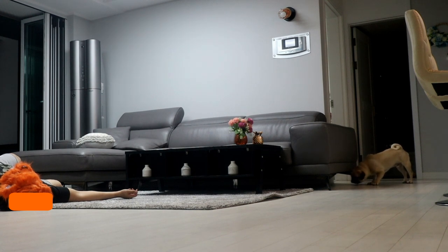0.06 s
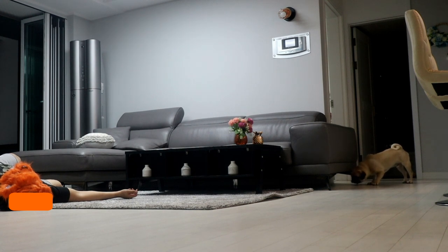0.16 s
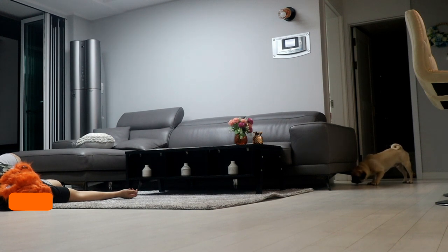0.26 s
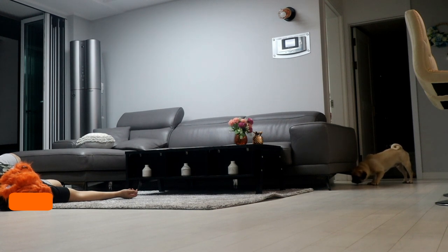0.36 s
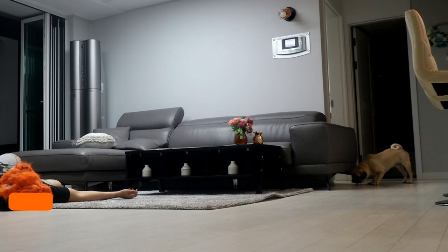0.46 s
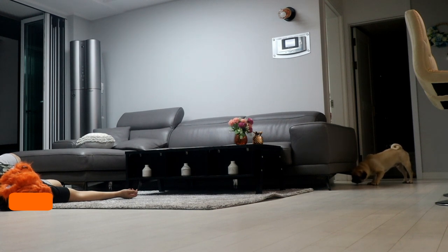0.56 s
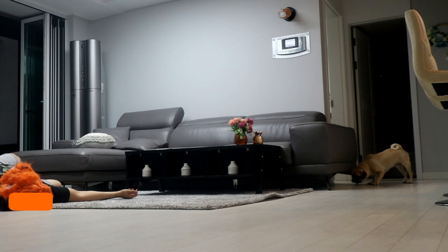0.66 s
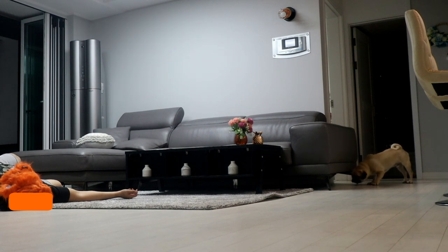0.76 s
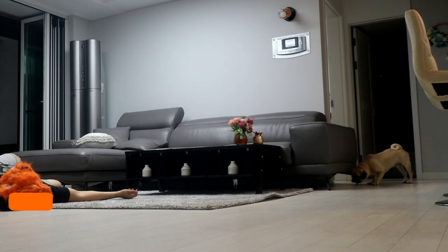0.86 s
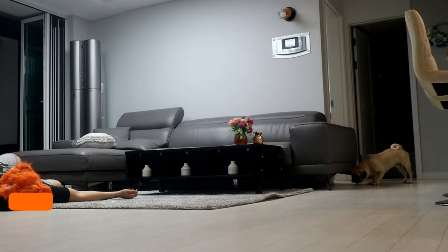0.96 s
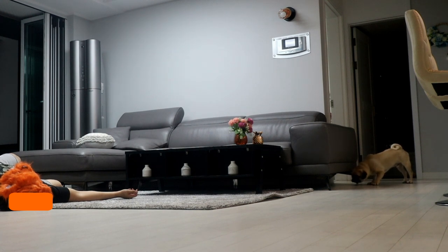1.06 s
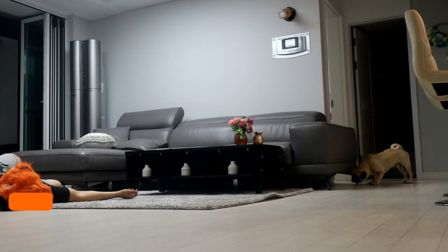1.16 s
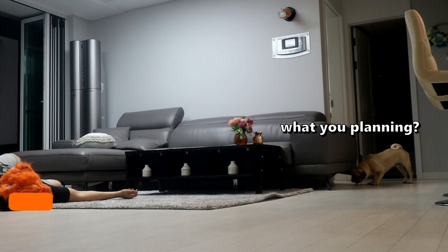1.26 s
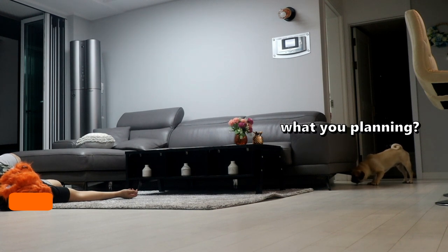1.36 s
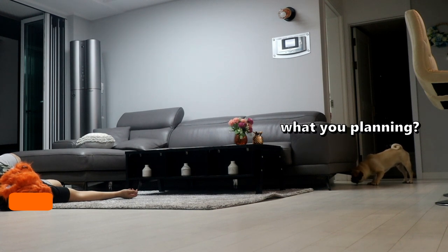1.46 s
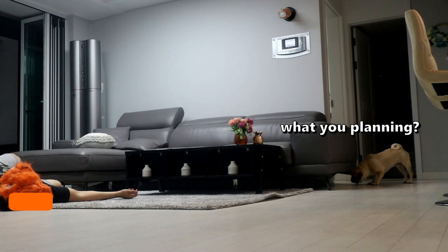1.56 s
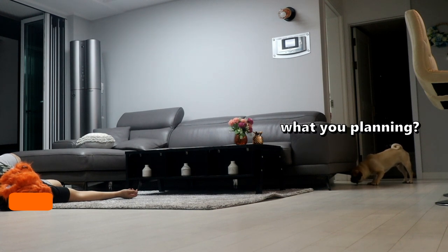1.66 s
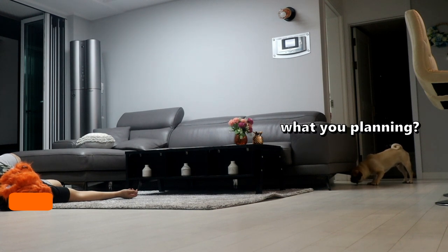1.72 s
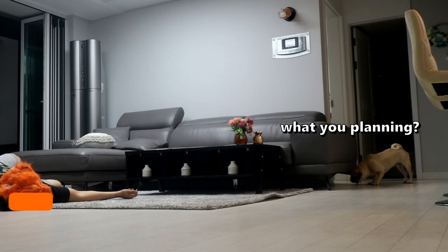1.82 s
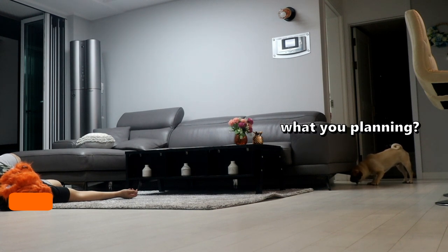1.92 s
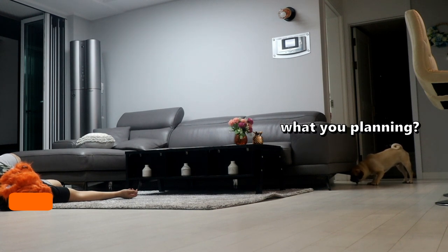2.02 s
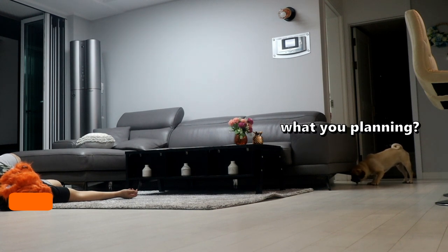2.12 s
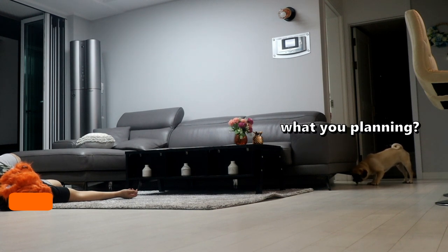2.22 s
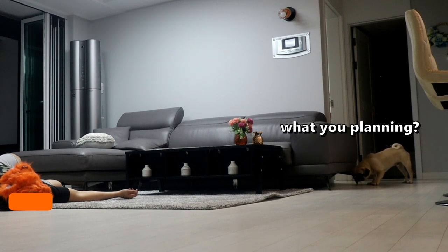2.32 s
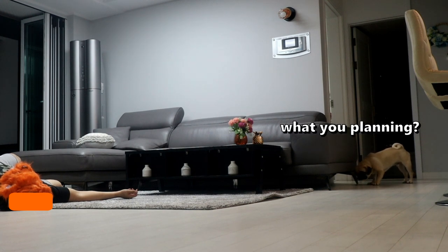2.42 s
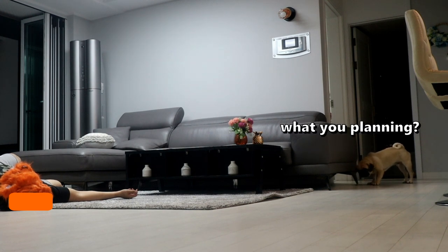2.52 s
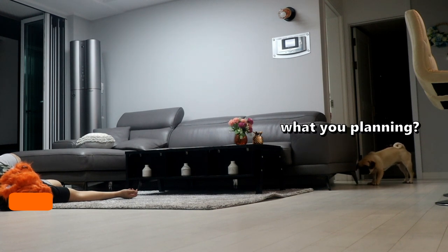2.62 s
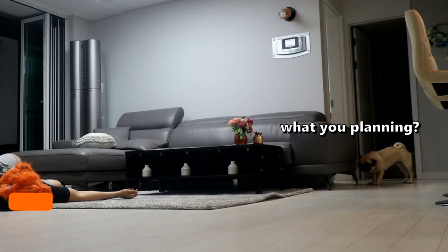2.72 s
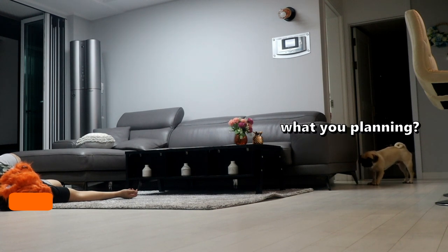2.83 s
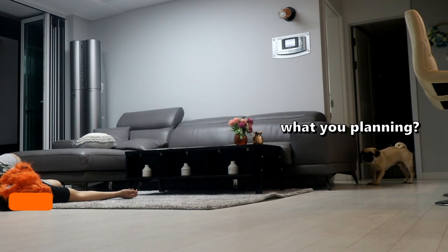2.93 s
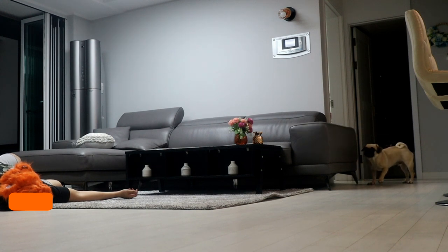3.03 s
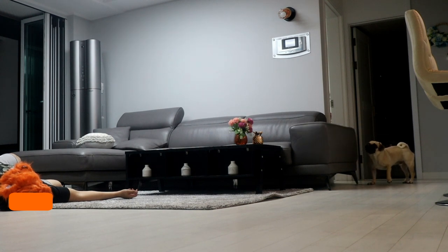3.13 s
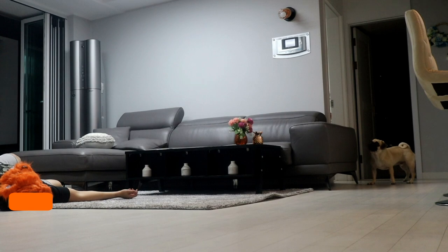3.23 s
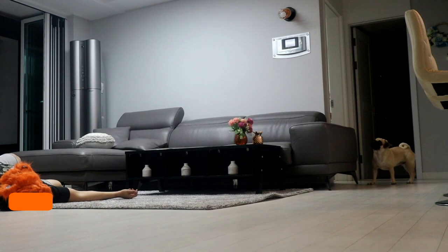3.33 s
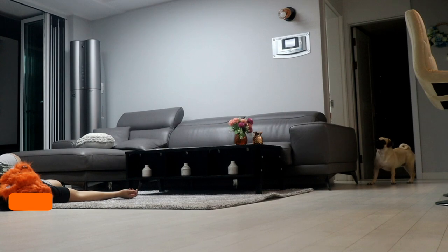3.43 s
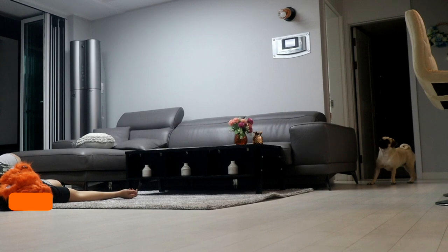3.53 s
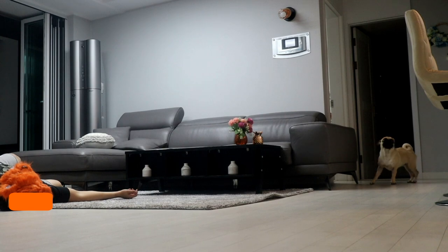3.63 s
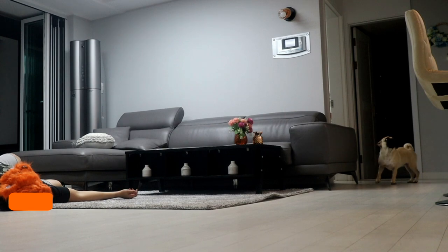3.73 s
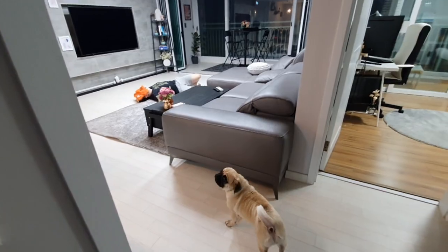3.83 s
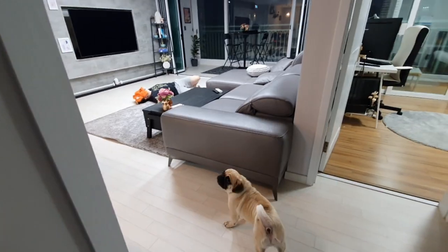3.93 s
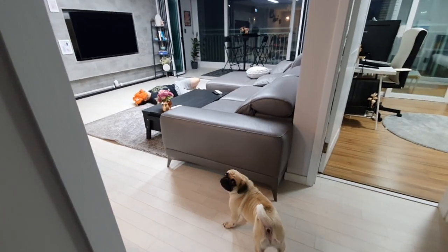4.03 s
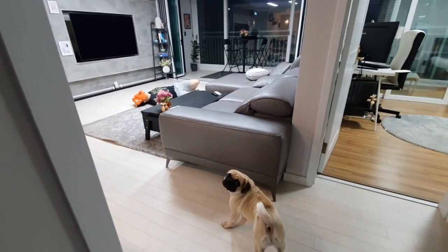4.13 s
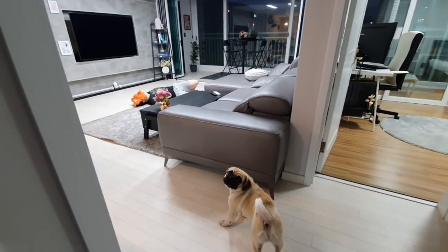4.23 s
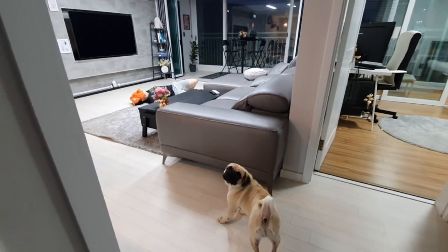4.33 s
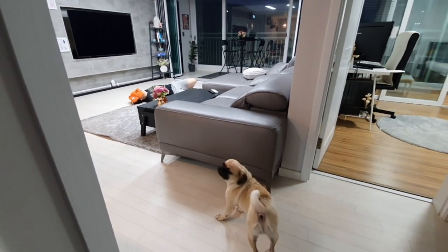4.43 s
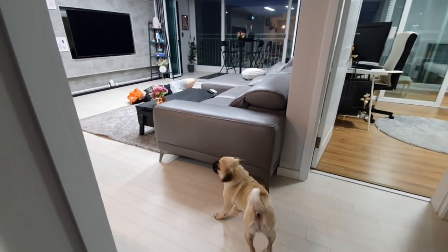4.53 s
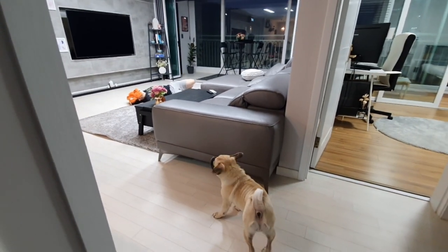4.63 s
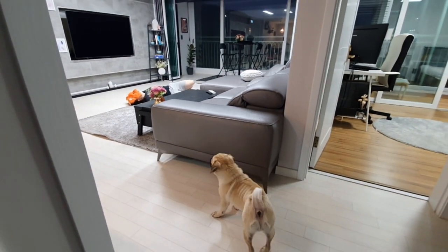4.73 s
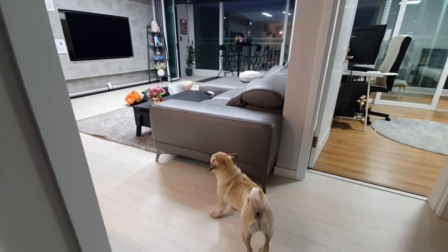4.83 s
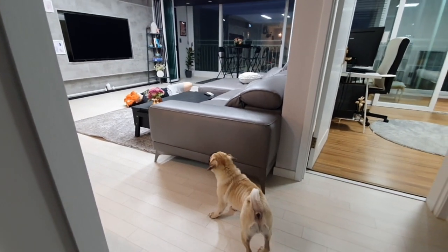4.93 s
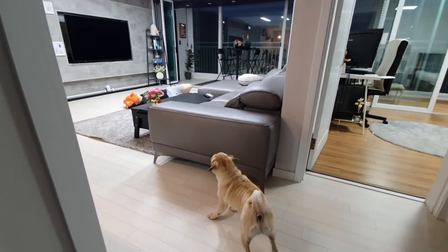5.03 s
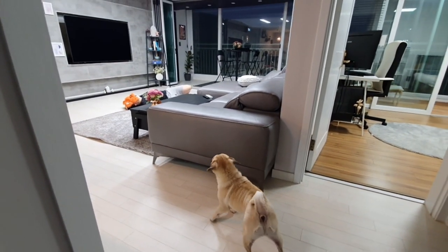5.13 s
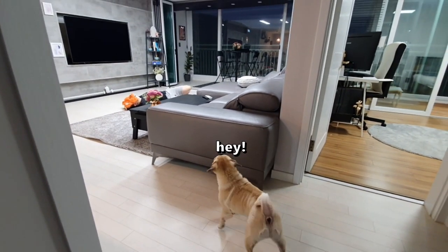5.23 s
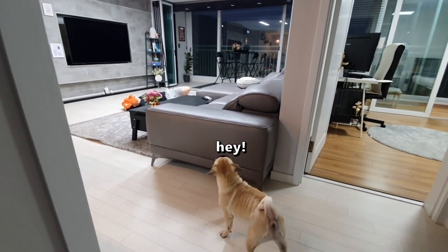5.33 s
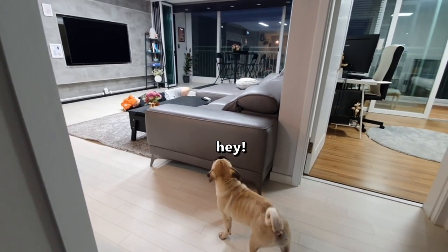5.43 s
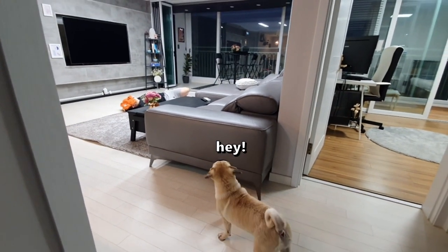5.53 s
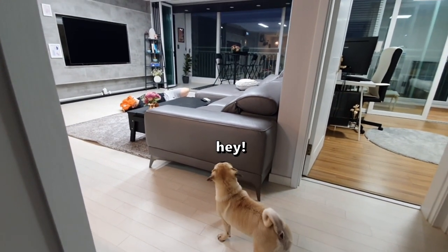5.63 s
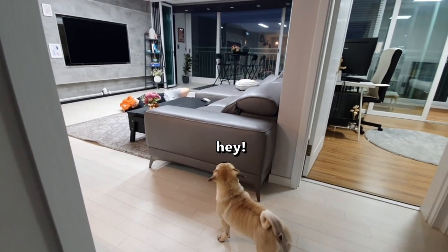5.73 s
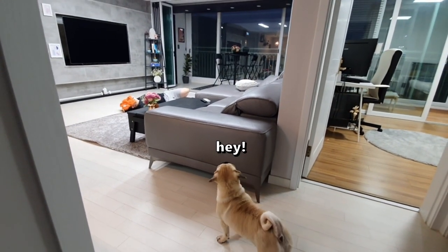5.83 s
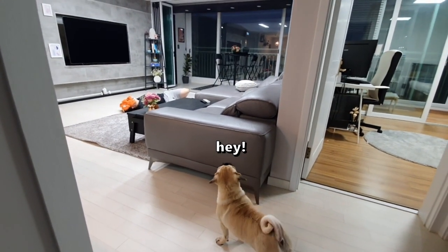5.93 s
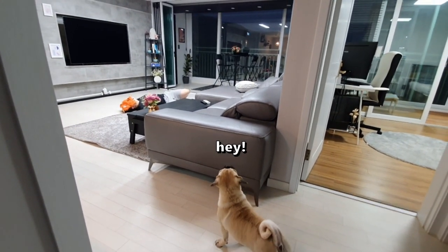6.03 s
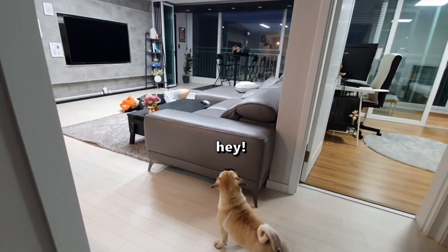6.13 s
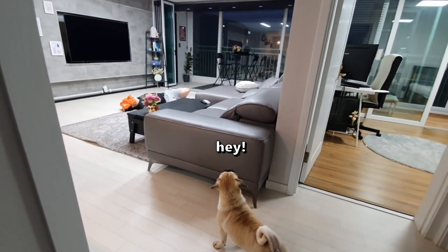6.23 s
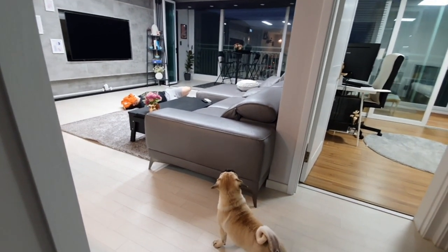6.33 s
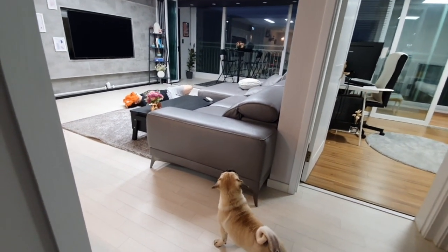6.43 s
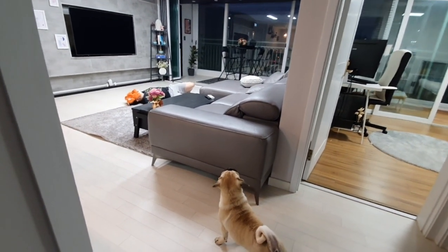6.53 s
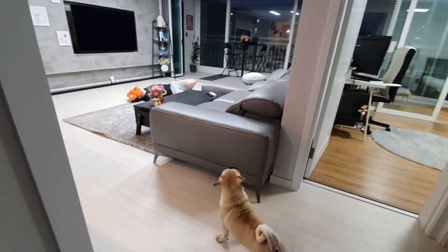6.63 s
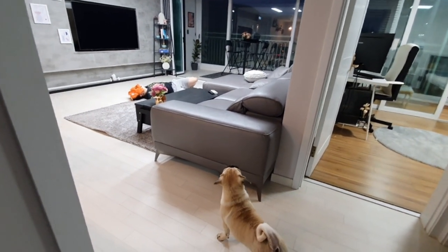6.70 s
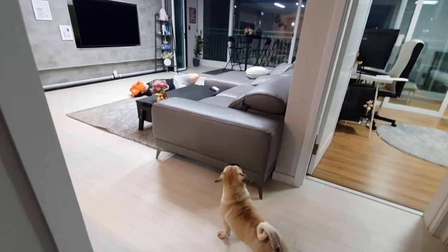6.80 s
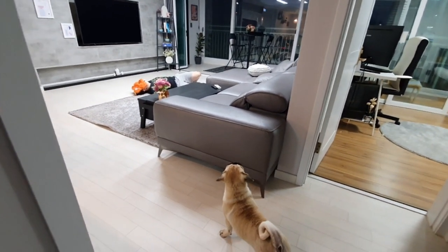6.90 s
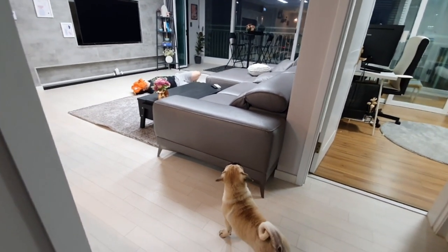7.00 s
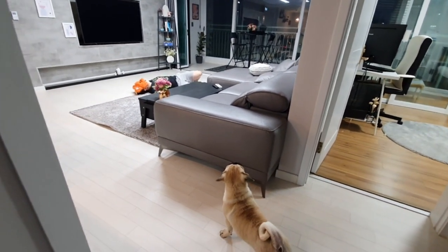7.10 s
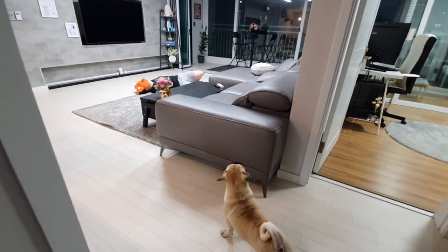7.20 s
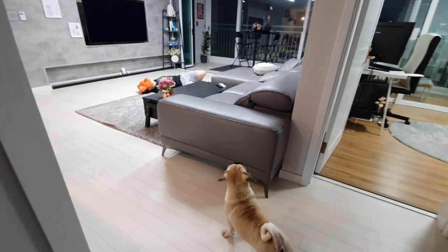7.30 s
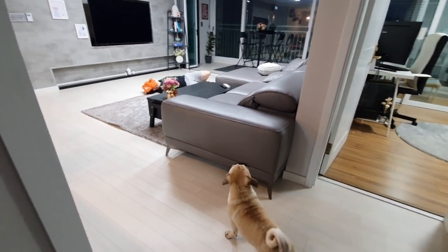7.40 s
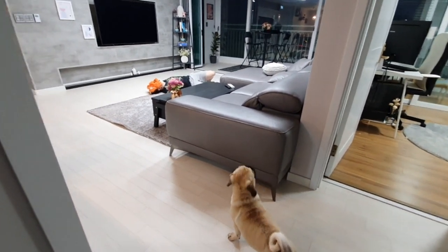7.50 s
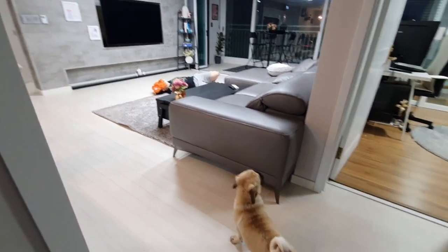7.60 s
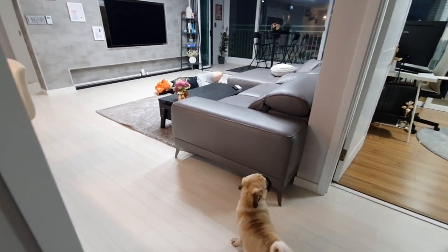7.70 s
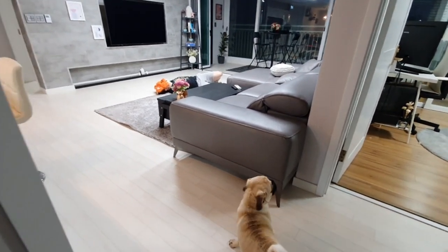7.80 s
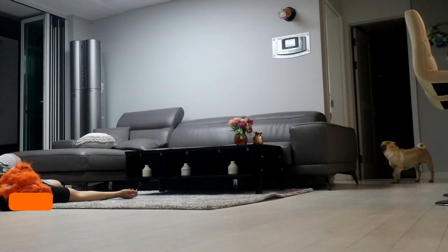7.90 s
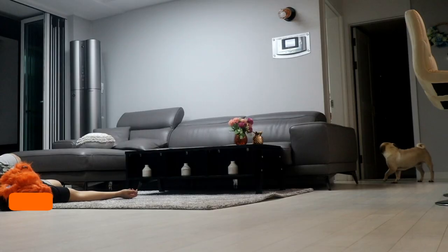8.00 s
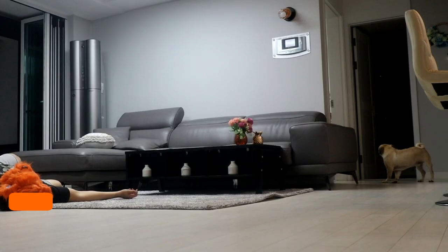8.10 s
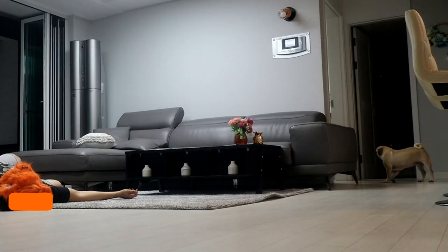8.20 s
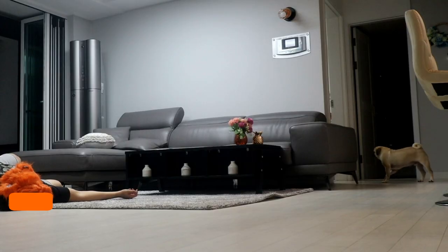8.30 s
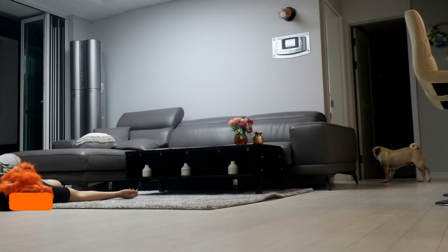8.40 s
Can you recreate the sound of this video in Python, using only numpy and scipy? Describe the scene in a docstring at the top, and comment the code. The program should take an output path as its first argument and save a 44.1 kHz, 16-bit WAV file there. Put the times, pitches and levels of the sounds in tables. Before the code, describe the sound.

In a reverberant living room with hard flooring, a small flat-faced dog holds a faint gravelly growl that pulses with palate flaps and breaks into one breathy woof, heard from across the room over hiss. After light claw scuffs, a closer, quieter perspective brings a bright loud bark, faint ticking paws, then a shorter, slightly lower bark with a ringing tail. Claws click, and the distant hissy perspective returns briefly.

```python
"""Pug growl, woof and two barks

A pug growls low across a hard-floored living room, slack folds and flapping palate, and ends in a gruff woof.
From close behind it barks twice, clear tone in rasp, with claw ticks and scuffs on the boards.
The background hisses at the far microphone, is quiet at the near one, and is far again for the last half second.
Noise-built reflections surround the dog; decaying room modes ring after each bark."""
import sys
import numpy as np
from scipy import signal
from scipy.fft import rfft, irfft, next_fast_len
from scipy.io import wavfile
from scipy.ndimage import uniform_filter1d, minimum_filter1d, map_coordinates

SR = 44100
rng = np.random.default_rng(int(sys.argv[2]) if len(sys.argv) > 2 else 0)


def to_wav(s):
    """Save 16-bit WAV."""
    ch = np.atleast_2d(s).T  # columns
    pcm = np.round(np.clip(ch, -1, 1) * 32767)  # PCM
    wavfile.write(sys.argv[1], SR, pcm.astype(np.int16))


N = 372729
TIME = np.arange(N) / SR

# left-right likeness of room sound, far and near: freq_hz, correlation
FAR_ALIKE = [(50, 0.88), (130, 1), (330, 0.78), (700, 0.15), (1300, -0.19), (3000, -0.031), (10000, -0.53)]
NEAR_ALIKE = [(60, 0.52), (300, 1), (700, 0.72), (1400, -0.56), (3000, -0.032), (10000, -0.25)]


def amp(db):
    """Decibels to gain."""
    return 10 ** (np.asarray(db) / 20)


def unit(x):
    """Scale to rms 1."""
    return x / np.sqrt(np.mean(x ** 2) + 1e-20)


def along(points, hz):
    """Interpolate (Hz, value) points on a log-frequency axis."""
    f, v = np.transpose(points)
    return np.interp(np.log(hz + 1), np.log(f + 1), v)


def curves(rows):
    """One value per sample for each column after the time."""
    s, *cols = np.transpose(rows)
    return [np.interp(TIME, s, c) for c in cols]


def wobble(rate_hz):
    """Smooth random curve with rate_hz knots a second."""
    knots = rng.standard_normal(int(N * rate_hz / SR) + 4)
    return map_coordinates(knots, [TIME * rate_hz])


def filtered(x, response):
    """Multiply the spectrum of x by a response of frequency."""
    size = next_fast_len(x.shape[-1] + 8192)
    spectrum = rfft(x, size) * response(np.fft.rfftfreq(size, 1 / SR))
    return irfft(spectrum, size)[..., :x.shape[-1]]


def coloured(x, spectrum, size=4096):
    """Minimum-phase filter with the given (Hz, dB) shape, by folding the cepstrum."""
    cepstrum = irfft(np.log(amp(along(spectrum, np.fft.rfftfreq(size, 1 / SR)))))
    cepstrum[1:size // 2] *= 2
    cepstrum[size // 2 + 1:] = 0
    impulse = irfft(np.exp(rfft(cepstrum)))
    return signal.oaconvolve(x, impulse)[:N]


def levelled(x, seconds):
    """Hold the running rms at 1, so that effort alone sets the loudness."""
    power = np.abs(uniform_filter1d(x * x, int(seconds * SR)))
    return x / np.sqrt(power + 1e-9)


def paired(noises, alike):
    """Turn two unrelated noises into left and right of the given likeness."""
    turn = lambda hz: np.arccos(np.clip(along(alike, hz), -1, 1)) / 2
    mid, side = filtered(noises, lambda hz: np.array([np.cos(turn(hz)), np.sin(turn(hz))]))
    return np.array([mid + side, mid - side])


def in_room(x, alike, direct_db, early_db, tail_db, early_t60=0.034, lag_ms=0.097):
    """Direct sound, right side first by lag_ms; a flurry from floor and furniture; a long tail."""
    # reverberation: freq_hz, t60_s
    room_t60 = [(100, 0.83), (300, 0.56), (700, 0.64), (1500, 0.63), (3000, 0.5), (6000, 0.64),
                (12000, 0.68)]
    age = TIME[:SR]
    hz, t, z = signal.stft(rng.standard_normal((2, SR)), SR, nperseg=256)
    decay = amp(-60 * t / along(room_t60, hz)[:, None])
    tail = signal.istft(z * decay, SR, nperseg=256)[1][:, :SR]
    tail = tail * (1 - np.exp(-age / 0.014))
    early = rng.standard_normal((2, SR)) * amp(-60 * age / early_t60)
    reflections = amp(early_db) * unit(early) + amp(tail_db) * unit(tail)
    walls = paired(reflections, alike) / np.sqrt(SR)
    delay = np.array([[-1j], [1j]]) * lag_ms / 1000  # half the lag on each side
    direct = filtered(x, lambda hz: np.exp(np.pi * hz * delay))
    return amp(direct_db) * direct + signal.fftconvolve(x[None], walls, axes=1)[:, :N]


def folds(pitch_hz, rough, jitter, shimmer_db):
    """Vocal fold pulses, jittered in time and size, mixed with air that escapes once a cycle."""
    cycles = np.cumsum(pitch_hz * np.exp(jitter * wobble(260))) / SR
    at = np.interp(np.arange(1, int(cycles[-1])), cycles, np.arange(N))
    # windowed sinc places each pulse between samples
    taps = at.astype(int)[:, None] + np.arange(-7, 9)
    offset = taps - at[:, None]
    shape = np.sinc(offset) * np.cos(np.pi * offset / 16) ** 2
    sizes = amp(shimmer_db * rng.standard_normal((len(at), 1)))
    pulses = np.bincount(np.clip(taps, 0, N).ravel(), (sizes * shape).ravel(), N + 1)[:N]
    pulses = pulses / np.sqrt(pitch_hz)
    air = rng.standard_normal(N) * (1 + np.cos(2 * np.pi * cycles)) ** 2
    rough = np.clip(rough, 0, 1)
    return np.sqrt(1 - rough) * unit(pulses - pulses.mean()) + np.sqrt(rough) * unit(air)


def push(s, attack_s, length_s, release_db_per_s):
    """Gain of one push of air: it rises, holds until its length is over, and dies away."""
    age = TIME - s
    release = amp(-release_db_per_s * np.maximum(age - length_s, 0))
    return np.clip(age / attack_s, 0, 1) * release


def flutter():
    """Palate flaps: each opens quickly and closes slowly, uneven in timing and size."""
    # soft palate: time_s, rate_flaps_per_s
    flap_rates = [(1.52, 23.6), (1.6, 24.8), (1.9, 24.4), (2.05, 21.5), (2.3, 18.8)]
    from_s, to_s = .03, 2.6
    flap_s, scatter_db = 0.0094, 2.2  # a flap peaks at half flap_s
    stray_cycles = .08
    rate, = curves(flap_rates)
    started = TIME > from_s
    turns = started * np.abs(np.cumsum(rate * started) / SR + stray_cycles * wobble(15))
    u = turns % 1 / rate / flap_s
    sizes = amp(scatter_db * rng.standard_normal(int(turns.max()) + 1))
    return sizes[turns.astype(int)] * 2 * u * np.exp(1 - 2 * u) * (TIME < to_s)


def shifting(x, spectrum, factor, share):
    """Resonances crossfade to ones scaled by factor as share goes from 0 to 1."""
    moved = [(hz * factor, db) for hz, db in spectrum]
    return coloured(x * (1 - share), spectrum) + coloured(x * share, moved)


def growl():
    """Slack folds beat unevenly near 100 Hz; palate flaps swell the voice and gate a nasal whistle."""
    # effort and mouth opening: time_s, effort_db, open_band_db
    pushes = [(0, -38.5, -1.5), (.2, -43, -3), (.5, -40, -2), (.77, -41, -5.5), (.86, -47, -3),
              (1.05, -41, -3), (1.39, -41.5, -1), (1.58, -45, -6.5), (1.87, -41.5, -14.5),
              (2.3, -39.5, -1.5), (2.48, -41, 0.5), (2.82, -46, -9)]
    # voice colours: freq_hz, level_db
    closed_mouth = [(45, -19), (75, 0.5), (102, 1), (140, 0.5), (190, 0.5), (260, -4), (330, -1),
                    (420, -2.5), (530, 2.5), (640, -3.5), (720, -8), (830, -9.5), (1150, -37), (1750, -28),
                    (2400, -36.5), (5000, -47.5)]
    open_mouth = [(500, -45), (780, -4), (1020, 13.5), (1200, -35), (1450, -39), (1750, -27), (2200, -25),
                  (3000, -16), (3400, -5.5), (3900, -24.5), (6000, -55.5)]
    nose = [(1200, -41), (1750, 0), (2300, -24), (3100, -28), (3400, 1), (3900, -17.5), (6400, -24),
            (7100, -7), (7800, -31), (8700, -2.5), (9500, -1.5), (10500, -2), (11400, -30), (15000, -60)]
    shut_mouth_db, ajar_mouth_db, shut_lowers = -11.5, -4.5, 0.94  # resonance factor when shut
    lips_s, lips_width_s, lips_raise = 2.46, 0.098, 1.182  # resonance factor, lips drawn back
    whistle_top_db, whistle_follows = -48.5, 0.22  # at peak effort; dB per dB of effort

    level_db, mouth_db = curves(pushes)
    shut = np.interp(mouth_db, [shut_mouth_db, ajar_mouth_db], [1, 0])
    lips = np.exp(-((TIME - lips_s) / lips_width_s) ** 2)
    flaps = flutter()
    throb = np.sqrt(flaps)
    source = folds(np.full(N, 102.), rough=.3, jitter=.19, shimmer_db=3.0)
    low_voice = shifting(source * (1 + .5 * throb), closed_mouth, shut_lowers, shut)
    upper_voice = shifting(source * (1 + 1.3 * throb), open_mouth, lips_raise, lips)
    voice = amp(level_db + 2.0) * levelled(low_voice, 0.039)
    voice += amp(level_db + mouth_db - 9.0) * levelled(upper_voice, 0.06)
    voice *= np.interp(TIME, [2.76, 2.84], [1, 0])

    whistle_db = whistle_top_db + whistle_follows * (level_db - level_db.max())
    nasal = coloured(folds(np.full(N, 170.), rough=0.56, jitter=0.14, shimmer_db=-1), nose)
    whistle = flaps * amp(whistle_db) * levelled(nasal, .03)
    return (in_room(voice, FAR_ALIKE, direct_db=-2.5, early_db=-3, tail_db=-2.5, early_t60=0.098)
            + in_room(whistle, FAR_ALIKE, direct_db=-13.0, early_db=-1.5, tail_db=-4,
                      early_t60=0.017, lag_ms=0.13))


def background():
    """Rumble and hiss from shaped noise: strong at the far microphone, faint and left at the near one."""
    # floor colours: freq_hz, level_db
    far_floor = [(15, -41), (30, -10), (55, -1.5), (110, -9.5), (190, -7.5), (400, -11.5), (900, -13.5),
                 (1500, -19), (2700, -22), (6000, -30), (11000, -36), (12500, -44.5), (15500, -69.5)]
    near_floor = [(15, -41.5), (25, -17), (64, -1.5), (144, -20.5), (178, -15), (297, -18.5), (433, -22),
                  (598, -25.5), (871, -23), (1900, -37.5), (3440, -44.5), (9810, -61.5), (15500, -52)]
    # far microphone: time_s, share_0_1
    far_share = [(0, 1), (3.772, 1), (3.78, 0), (7.918, 0), (7.928, 1), (8.46, 1)]
    # floor likeness: freq_hz, correlation
    far_likeness = [(50, 0.94), (130, 0.6), (330, 0.1), (700, -0.16), (3000, -0.6), (10000, -0.52)]
    near_likeness = [(60, -0.033), (300, 0.078), (1200, -0.63), (8000, -0.41)]

    def hush(colour, alike):
        """Stereo noise of rms 1 with the given colour and likeness."""
        noise = paired(rng.standard_normal((2, N)), alike)
        return unit(filtered(noise, lambda hz: amp(along(colour, hz))))

    share, = curves(far_share)
    far = hush(far_floor, far_likeness) * amp([[-46], [-47.5]])
    near = hush(near_floor, near_likeness) * amp([[-52], [-58]])
    return share * far + (1 - share) * near * amp(1.4 * wobble(3.7))


def swell(s, length_s):
    """Rise to 1 at half length_s after s, then a slower fall."""
    u = np.clip((TIME - s) / length_s, 0, 20)
    return 2 * u * np.exp(1 - 2 * u)


def touch(s, db, length_s, response):
    """Short grainy rub: a swell of noise in the band that response lets through."""
    span = SR // 2
    start = min(round(s * SR), N - 1)
    grain = np.zeros(N + span)
    grain[start:][:span] = unit(filtered(rng.standard_normal(span), response))
    return amp(db) * swell(s, length_s) * grain[:N]


def paws():
    """Claws scuff as wideband noise; pads thud as noise through a damped resonance."""
    # scuffs on the boards: start_s, level_db, length_s, upper_edge_hz, strokes
    scuff_rows = [(2.615, -50.5, 0.023, 13000, 3), (3.345, -50.5, 0.023, 13200, 1),
                  (3.434, -51.5, 0.024, 12900, 3), (3.473, -42, .018, 8300, 1),
                  (3.841, -57.5, 0.028, 6100, 1), (4.83, -59.5, 0.039, 5500, 1),
                  (5.225, -63, 0.045, 5500, 1), (5.994, -68, 0.039, 2160, 1),
                  (6.751, -63.5, 0.011, 5060, 1), (6.965, -58.5, 0.021, 7000, 1),
                  (8.192, -52.5, 0.033, 13100, 1), (8.314, -42.5, 0.026, 13800, 1)]
    # scuff colour: freq_hz, level_db
    scuff_colour = [(300, 0.5), (1200, -3.5), (2700, -2.5), (4500, -7), (7000, -3.5), (10800, -1.5),
                    (12500, -5.5), (15500, -26)]
    # soft footfalls: start_s, level_db, length_s, pitch_hz
    step_rows = [(2.803, -37, 0.03, 61.5), (3.874, -46.5, 0.026, 520), (3.882, -48, .052, 78),
                 (4.797, -54.5, 0.045, 560), (4.807, -51, 0.068, 76), (5.279, -46.5, .025, 65.7),
                 (6.0, -50.5, .05, 75.6), (7.961, -47, 0.11, 138)]
    stroke_gap_s = .044

    scuffs = np.zeros(N)
    for s, db, length_s, edge_hz, strokes in scuff_rows:
        band = lambda hz: amp(along(scuff_colour, hz)) / (1 + (hz / edge_hz) ** 6)
        for k in range(round(strokes)):
            scuffs += touch(s + k * stroke_gap_s, db, length_s, band)
    steps = np.zeros(N)
    for s, db, length_s, pitch_hz in step_rows:
        thud = lambda hz: (hz * pitch_hz / (pitch_hz ** 2 - hz ** 2 + 1j * hz * pitch_hz)) ** 2
        steps += touch(s, db, length_s, thud)
    grainy = scuffs * amp(4.2 * wobble(400))
    return (in_room(grainy, FAR_ALIKE, direct_db=-8, early_db=-1.5, tail_db=-2)
            + in_room(steps, FAR_ALIKE, direct_db=-4.5, early_db=-5.0, tail_db=-3.5))


def call(row, throat, jitter, shimmer_db, steady_air_db):
    """One push of voice through the throat, with some air that streams out unchopped."""
    s, attack_s, hold_s, release_db_per_s, level_db, top_hz, rough = row
    top_s, sag_per_s = 2.7, 2.8  # log pitch per s, away from top_s for 0.2 s, then steady
    pitch_hz = top_hz * np.exp(-sag_per_s * np.minimum(np.abs(TIME - top_s), .2))
    source = folds(pitch_hz, rough, jitter, shimmer_db) + amp(steady_air_db) * rng.standard_normal(N)
    voice = levelled(coloured(source, throat), 0.015)
    return push(s, attack_s, attack_s + hold_s, release_db_per_s) * amp(level_db) * voice


def woof():
    """Three overlapping pushes: the chest swells, the mouth bursts open, the voice ends in a rasp."""
    # chest, mouth, rasp: start_s, attack_s, hold_s, release_db_per_s, level_db, pitch_at_2.7_s_hz, rough_0_1
    calls = [(2.863, 0.028, 0.081, 237, -29, 115, 0.82), (2.909, 0.0072, 0.043, 139, -26, 190.8, 0.8),
             (2.965, .045, .006, 184, -39, 179.3, 0.8)]
    # colours: freq_hz, level_db
    chest_colour = [(50, -28), (100, 0), (190, 0.5), (270, -3.5), (380, 4.5), (600, -4), (830, -9),
                    (1200, -32), (2500, -26.5), (5000, -41), (11000, -33), (14000, -73)]
    mouth_colour = [(120, -7.5), (200, 5), (400, -10), (650, 0), (900, 2.5), (1150, -4.5), (1400, -9.5),
                    (1800, -18), (2700, -18), (3300, -21), (4000, -23), (4700, -39), (6200, -21),
                    (8000, -26), (10600, -18.5), (12500, -40), (15500, -65.5)]
    rasp_colour = [(1500, -29), (2200, -5.5), (2650, 7.5), (3200, -2), (3600, -13), (4500, -18),
                   (12000, -58)]
    chest = call(calls[0], chest_colour, jitter=.14, shimmer_db=6, steady_air_db=-15)
    mouth = call(calls[1], mouth_colour, jitter=.2, shimmer_db=11, steady_air_db=-1.5)
    rasp = call(calls[2], rasp_colour, jitter=.1, shimmer_db=-1, steady_air_db=-10)
    return in_room(chest + mouth + rasp, FAR_ALIKE, direct_db=-2.5, early_db=1.0, tail_db=-3.5)


def patter(count):
    """Faint ticks spread loosely over each run as the dog shifts its weight: (s, dB, Hz) rows."""
    # tick runs: start_s, length_s, level_db
    runs = [(6.018, .075, -50.5), (6.239, 0.13, -54), (6.648, .17, -51)]
    pitch_hz, scatter_db = 1290, 1
    return [(s + length_s * (k + rng.random()) / count,
             db + scatter_db * rng.standard_normal(), pitch_hz)
            for s, length_s, db in runs for k in range(count)]


def ticks():
    """Hard little claw contacts: a dry noise crack and a few short woody modes."""
    # claws and small ticks: start_s, level_db, pitch_hz
    tick_rows = [(4.003, -34.5, 2260), (5.033, -50, 1300), (5.264, -38.5, 1250), (5.301, -38.5, 1243),
                 (6.007, -45, 1233), (6.721, -48, 1210), (6.753, -35, 1234), (6.793, -45.5, 1380),
                 (7.067, -33, 2570), (7.076, -38.5, 2610), (7.229, -36.5, 2540), (7.633, -27, 1290),
                 (7.706, -35, 1200)]
    # claw ring on the boards: pitch_ratio, level_db, t60_s
    claw_modes = [(.5, -7, 0.0077), (0.619, -5, 0.013), (.78, -3.5, 0.012), (.92, -3, 0.01),
                  (1.03, -1, .016), (2.05, -12.5, .007)]
    out, age = np.zeros(N + SR), TIME[:SR // 20]
    for s, db, pitch_hz in tick_rows + patter(count=4):
        ring = np.zeros(len(age))
        for ratio, level_db, t60 in claw_modes:
            strength = amp(level_db + rng.normal(0, 3.9))
            tone = np.sin(2 * np.pi * (ratio * pitch_hz * age + rng.random()))
            ring += strength * tone * np.exp(-np.log(1000) * age / t60)
        burst = rng.standard_normal(len(age)) * np.exp(-age / 0.00072)
        crack = filtered(burst, lambda hz: 1 / (1 + (hz / 4000) ** 4))
        contact = ring * (1 - np.exp(-age / 0.0005)) + .5 * crack
        out[round(s * SR):][:len(age)] += amp(db + 5) * contact
    return in_room(out[:N], NEAR_ALIKE, direct_db=-6.5, early_db=-1.5, tail_db=-12.5,
                   early_t60=.02, lag_ms=0.018)


def standing(x):
    """Room modes ring on at their own pitch, about 120 degrees apart at the two sides."""
    # standing waves: freq_hz, level_db, t60_s
    modes = [(309, -3, 0.93), (525, -3.5, .6), (614, 0, 0.78), (700, -4, 0.43), (775, -10.5, 0.63),
             (950, -3.5, 0.8), (1222, -1.5, 0.52), (1460, 6.5, 0.66), (1850, 2, .6), (1940, 4, 0.96)]
    age, ports_rad = TIME[:SR], np.array([[-1.05], [1.05]])
    ring = sum(amp(db) * np.sin(2 * np.pi * hz * age + ports_rad) * np.exp(-np.log(1000) * age / t60)
               for hz, db, t60 in modes)
    return signal.fftconvolve(x[None], ring * 20 / SR, axes=1)[:, :N]


def bark(row, tone, throat, rough, lag_ms, tone_direct_db, tone_tail_db, modes_db,
         rasp_direct_db, rasp_early_db, rasp_tail_db):
    """Arching tone, strongest at the second harmonic, wrapped in the rasp of unevenly beating folds."""
    s, attack_s, length_s, release_db_per_s, tone_db, rasp_db, top_hz, top_s, open_s, open_db = row
    rise_hz_per_s, sag_hz_per_s = 1350, 580
    slack_hz_per_s = 440  # extra fall once the push ends
    rasp_attack_s, tone_lag_s = .018, 0.0047  # the rasp speaks first
    rasp_fade_db_per_s = 147  # as the folds lock
    shut_db = -19.5  # treble of a shut mouth

    age = np.clip(TIME - s, 0, 2 * length_s)
    pitch_hz = (top_hz - rise_hz_per_s * np.maximum(top_s - age, 0)
                - sag_hz_per_s * np.maximum(age - top_s, 0)
                - slack_hz_per_s * np.maximum(age - length_s, 0))
    mouth_db = np.interp(age, [0, open_s], [shut_db, open_db])
    unsettled = np.exp(-age / 0.042)  # the folds start chaotically, then lock

    stray = np.exp((0.0066 + 0.07 * unsettled) * wobble(300))
    phase = 2 * np.pi * np.cumsum(pitch_hz * stray) / SR
    harmonics = unit(sum(amp(db) * np.sin(round(k) * phase) for k, db in tone))
    tone_gain = push(s + tone_lag_s, attack_s, length_s - tone_lag_s, release_db_per_s)
    clear = tone_gain * amp(tone_db) * harmonics

    source = folds(pitch_hz, rough + unsettled, jitter=.012, shimmer_db=3.5)
    rasp = levelled(coloured(source, throat), 0.0091)
    treble = filtered(rasp, lambda hz: 1 - 1 / (1 + (hz / 1700) ** 4))
    mouthed = rasp + (amp(mouth_db) - 1) * treble
    fading_db = rasp_db - rasp_fade_db_per_s * np.maximum(age - rasp_attack_s, 0)
    rasp = push(s, rasp_attack_s, length_s, release_db_per_s) * amp(fading_db) * mouthed
    return (in_room(clear, NEAR_ALIKE, tone_direct_db, early_db=-11.0, tail_db=tone_tail_db, lag_ms=lag_ms)
            + amp(modes_db) * standing(clear)
            + in_room(rasp, NEAR_ALIKE, rasp_direct_db, rasp_early_db, rasp_tail_db,
                      early_t60=0.094, lag_ms=lag_ms))


def barks():
    """The dog faces away, so its rasp arrives mostly by way of the room."""
    # high, low: start_s, attack_s, length_s, release_db_per_s, tone_db, rasp_db, top_pitch_hz,
    # time_to_top_s, time_to_open_s, open_treble_db
    bark_rows = [(5.323, 0.022, .097, 1499.5, -7, -10.5, 367.5, .066, 0.058, 5),
                 (7.349, 0.021, .058, 450, -10, -12, 339.7, .016, 0.03, 2.5)]
    # harmonics: pitch_multiple, level_db
    high_tone = [(1, -29.5), (2, -1.5), (3, -27), (4, -14), (5, -28.5), (6, -36.5)]
    low_tone = [(1, -21.5), (2, 4), (3, -4.5), (4, -15.5), (5, -32), (6, -38)]
    # rasp colours: freq_hz, level_db
    high_throat = [(120, -31), (330, -16.5), (520, -2), (690, -2.5), (880, -4.5), (1250, 0.5), (1700, -9),
                   (2300, -22.5), (2550, -33), (2900, -16), (3800, -21.5), (4200, -38.5), (4650, -42),
                   (5100, -56.5), (7200, -57), (7800, -53), (8600, -64.5), (12000, -55), (15500, -65.5)]
    low_throat = [(120, -25.5), (320, -11), (460, 0.5), (640, -4.5), (800, -1), (980, 3), (1300, -3.5),
                  (1800, -18), (2500, -26.5), (2740, -10.5), (3050, -23), (3500, -31), (4000, -24),
                  (4450, -40), (5000, -48), (7800, -46.5), (9000, -55.5), (11000, -48), (15500, -62)]
    high = bark(bark_rows[0], high_tone, high_throat, rough=0.23, lag_ms=0.24,
                tone_direct_db=0.5, tone_tail_db=-7.5, modes_db=3.5,
                rasp_direct_db=-3.0, rasp_early_db=5, rasp_tail_db=-1.5)
    low = bark(bark_rows[1], low_tone, low_throat, rough=.15, lag_ms=0.35,
               tone_direct_db=-1.5, tone_tail_db=-8.5, modes_db=7.0,
               rasp_direct_db=-9.0, rasp_early_db=0, rasp_tail_db=-4.0)
    return high * amp([[-.5], [.5]]) + low * amp([[.8], [-.8]])  # left, right


def scene():
    """The dog, its feet and the room."""
    return growl() + background() + paws() + woof() + ticks() + barks()


def record(dry):
    """A look-ahead limiter eases peaks above full scale down; nothing is kept above the band limit."""
    top_hz = 15750
    needed = 1 / np.maximum(np.abs(dry).max(axis=0), 1)
    gain = uniform_filter1d(minimum_filter1d(needed, size=800), size=800)
    return filtered(dry * gain, lambda hz: hz < top_hz)


dry = scene()
out = record(dry)
to_wav(out)
```